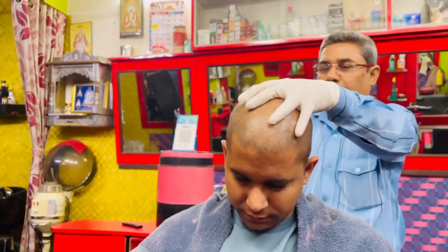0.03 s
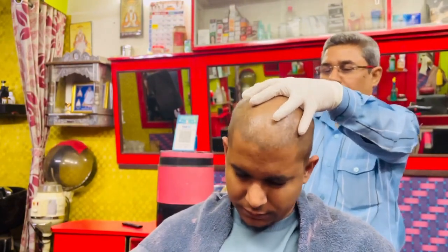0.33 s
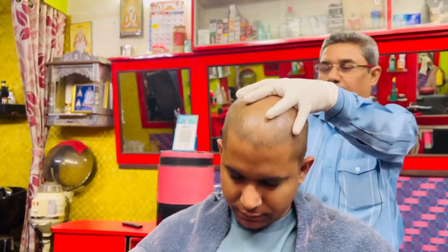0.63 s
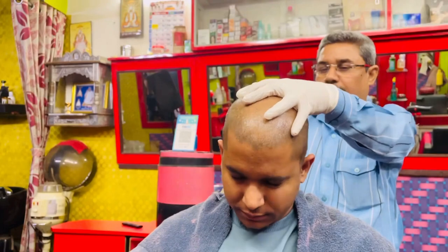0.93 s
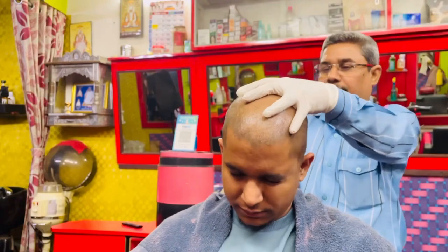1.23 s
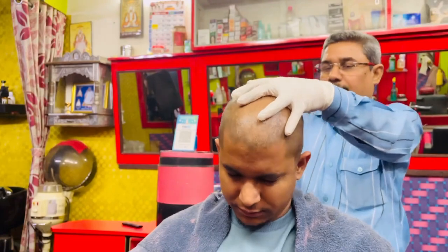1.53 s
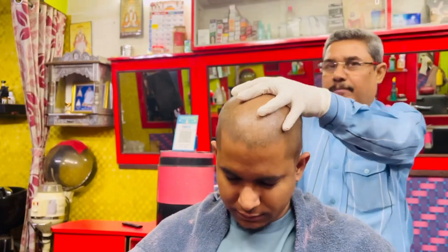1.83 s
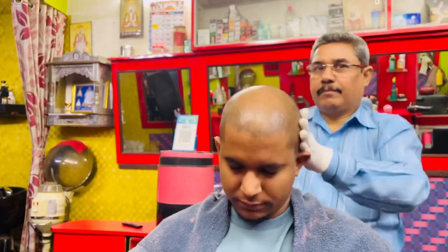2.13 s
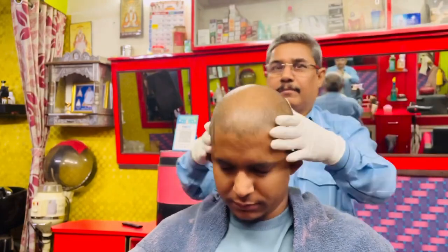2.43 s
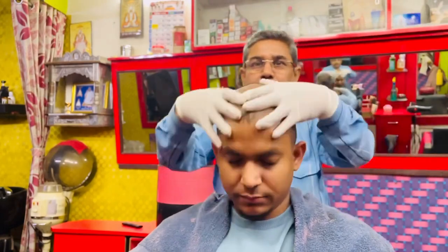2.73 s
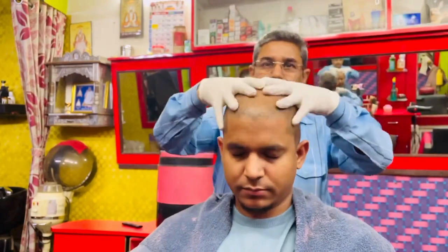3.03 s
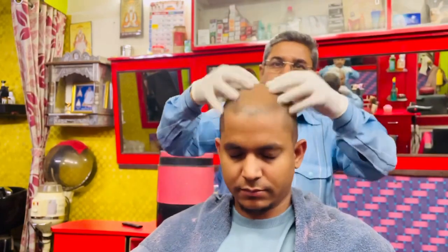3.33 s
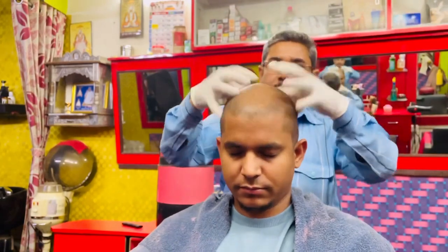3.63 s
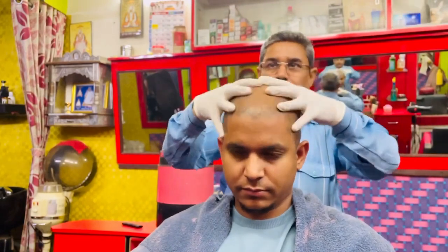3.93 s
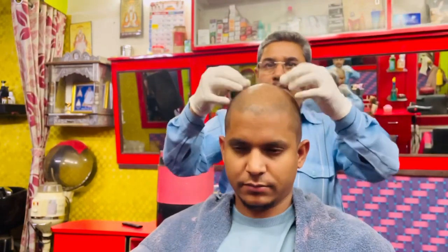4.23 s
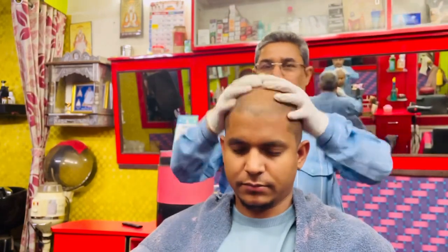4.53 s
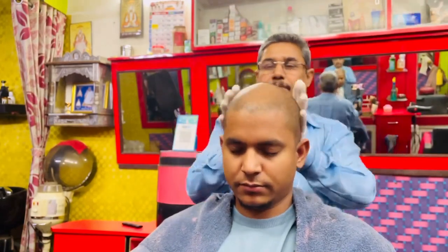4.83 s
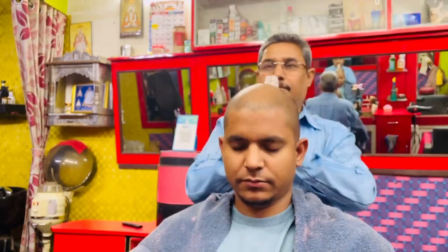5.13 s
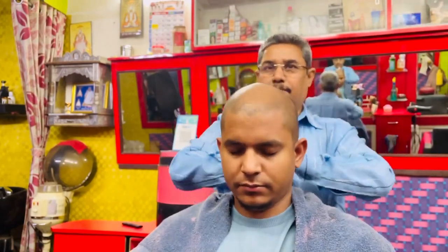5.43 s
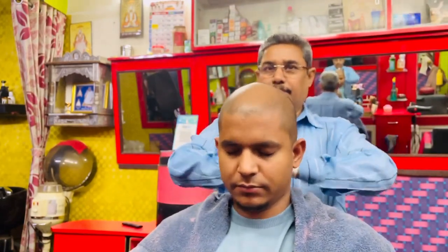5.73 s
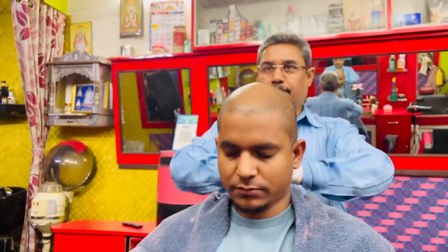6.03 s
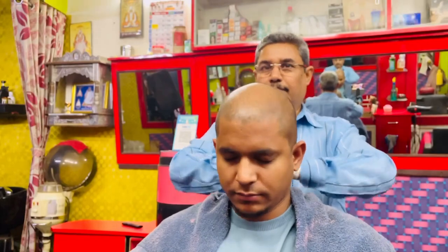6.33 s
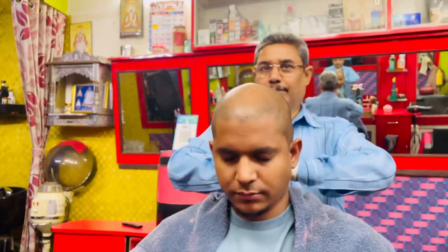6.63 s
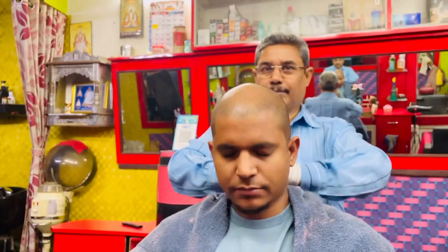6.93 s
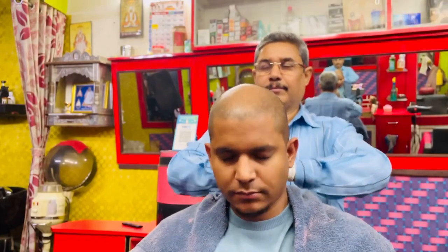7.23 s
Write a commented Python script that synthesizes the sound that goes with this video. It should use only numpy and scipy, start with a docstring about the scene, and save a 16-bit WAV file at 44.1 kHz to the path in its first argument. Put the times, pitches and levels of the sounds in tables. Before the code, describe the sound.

Ventilation and a low motor hum fill a small room, with a stereo microphone close to a head massage. Gloved fingers tick and hiss quietly over stubble, then snap off the scalp several times amid cloth rustle and soft low bumps. The hands clap once, brightly, and go on to slap the neck about four times a second, each loud, hollow smack ringing briefly off the hard walls.

```python
"""Head massage in a barber shop.

A small, hard-walled room, one stereo microphone near the chair, ventilation and a motor behind it all.
A gloved hand creeps over a shaved scalp, both hands glide round it, hissing on the stubble, and the
fingertips flick off in a quick run. The masseur shifts his stance and claps once, then cupped hands slap
the neck about four times a second. The head hides the slaps, so they arrive mostly by way of the walls."""
import sys
import numpy as np
from scipy import signal
from scipy.fft import rfft, irfft, next_fast_len
from scipy.io import wavfile

SR = 44100
rng = np.random.default_rng(int(sys.argv[2]) if len(sys.argv) > 2 else 0)


def to_wav(sig):
    """Store sig (one row per channel, or 1-D mono) as 16-bit WAV at the path in sys.argv[1].

    Samples outside -1..1 are clipped; the rate is SR.
    """
    pcm = np.clip(np.atleast_2d(sig), -1, 1) * 32767
    pcm = np.round(pcm).astype(np.int16)
    wavfile.write(sys.argv[1], SR, pcm.T)  # frames by channels


N = 325899
TIME = np.arange(N) / SR
TAIL = TIME[:SR // 2]   # time axis of one hit or echo
HZ = np.fft.rfftfreq(len(TAIL), 1 / SR)


def from_db(db):
    return 10 ** (np.asarray(db) / 20)

def rms_one(x):
    return x / np.sqrt(np.mean(x ** 2) + 1e-20)

def energy_one(x):
    return x / np.linalg.norm(x)

def pan(left_db):
    """Stereo gains: the left goes up by left_db, the right down by as much."""
    return from_db([[left_db], [-left_db]])

def add(track, s, sound):
    """Lay a sound into a track at time s."""
    start = int(s * SR)
    track[..., start:start + sound.shape[-1]] += sound[..., :N - start]

def at_hz(points, hz):
    """Read a table on a log-frequency axis."""
    known_hz, values = np.transpose(points)
    return np.interp(np.log(hz + 1e-9), np.log(known_hz), values)

def colour(x, spectrum):
    """Give white sound a spectrum, keeping its power."""
    size = next_fast_len(N, real=True)
    gain = from_db(at_hz(spectrum, np.fft.rfftfreq(size, 1 / SR)))
    return irfft(rfft(x, size) * rms_one(gain), size)[..., :N]

def cut(x, hz, kind, order=2):
    """Butterworth filter."""
    return signal.sosfilt(signal.butter(order, hz, kind, fs=SR, output="sos"), x)

def resonate(x, hz, width_hz):
    """A resonance with gain 1 at its peak."""
    return signal.lfilter(*signal.iirpeak(hz, hz / width_hz, fs=SR), x)

def ring(x, resonances):
    """Let resonances (f/Hz, width/Hz, boost/dB) ring along with a sound, side by side."""
    return x + sum((from_db(db) - 1) * resonate(x, hz, width_hz) for hz, width_hz, db in resonances)

def waver(rate_hz):
    """A slow random drift of spread about 1."""
    knots = rng.standard_normal(300)
    return np.interp(TIME * rate_hz, np.arange(len(knots)), knots)

def surge(s, rise_s, fall_s):
    """Gain of a movement that gathers speed up to 1 at time s and slows again."""
    return np.exp(-np.maximum((s - TIME) / rise_s, (TIME - s) / fall_s))

def level_curve(rows, settle_db_per_s=53):
    """Gain from rows of (t/s, level/dB), dying away before the first and after the last."""
    s, db = np.transpose(rows)
    outside_s = np.abs(TIME - np.clip(TIME, s[0], s[-1]))
    return from_db(np.interp(TIME, s, db) - settle_db_per_s * outside_s)

def contact(spectrum, length_s, tilt=0):
    """A click of unit energy, smeared over the time soft skin takes to meet; tilt in dB per octave."""
    log_gain = np.log(from_db(at_hz(spectrum, HZ) + tilt * np.log2(1 + HZ / 500)))
    cepstrum = irfft(log_gain, len(TAIL))
    cepstrum[1:len(TAIL) // 2] *= 2   # minimum phase: nothing sounds before the touch
    cepstrum[len(TAIL) // 2:] = 0
    click = np.exp(rfft(cepstrum))
    for delay_s in rng.uniform(.04, .3, 6) * length_s:
        lag = np.exp(-2j * np.pi * HZ * max(1, round(delay_s * SR)) / SR)
        click = click * (lag - .5) / (1 - .5 * lag)   # an allpass spreads it and keeps its colour
    return energy_one(irfft(click, len(TAIL)))


# Likeness of the room's sound on the two sides of the microphone: f/Hz, correlation
LIKENESS = [(30, 0.88), (130, 0.95), (260, 0.83), (500, 0.057), (1200, 0.063), (2500, 0.29), (6000, 0.014),
            (14000, 0.032)]
def diffuse(size):
    """White stereo noise as a room delivers it: alike in the bass, mostly unrelated higher up."""
    padded = next_fast_len(size, real=True)
    alike = at_hz(LIKENESS, np.fft.rfftfreq(padded, 1 / SR))
    mid, side = rfft(rng.standard_normal((2, padded)))
    left_right = np.sqrt(1 + alike) * mid + np.sqrt(1 - alike) * side * [[1], [-1]]
    return irfft(left_right, padded)[:, :size] / np.sqrt(2)


# Room tone, ventilation and distant street: f/Hz, relative level/dB
AIR_COLOUR = [(20, -24), (40, -24), (60, -1), (85, -8), (120, 0), (170, -0.5), (280, -6), (360, -8),
              (480, -5), (620, -12.5), (1300, -14.5), (2400, -23.5), (4200, -40), (7000, -50.5),
              (14000, -40.5), (16000, -55)]
# Low resonances of the shop: f/Hz, width/Hz, relative level/dB
DRONE = [(65.6, 4.3, -51), (126.4, 15, -48.5), (174.4, 12, -53.5), (287, 36, -50)]
def shop_air(rush_db=-41):
    """Ventilation rushes all round the microphone and keeps the room's low resonances droning."""
    stir = diffuse(N)
    drone = sum(from_db(db) * rms_one(resonate(stir, hz, width_hz)) for hz, width_hz, db in DRONE)
    rush = from_db(rush_db) * colour(diffuse(N), AIR_COLOUR)
    return rush + cut(drone, 500, "low")


# Tones of a motor nearby: f/Hz, relative level/dB
HUM = [(122, -52), (401, -65.5)]
# The hum swells and sinks: t/s, gain/dB
HUM_SWELL = [(0.5, 3), (1.2, 7.5), (1.9, 0), (2.7, -7), (3.5, 0.5), (4.5, -3), (7.3, -8)]
def motor_hum(waver_hz=1.69, waver_db=2.0):
    """A motor hums, each tone wavering a little in level and pitch."""
    hum = np.zeros(N)
    for hz, db in HUM:
        gain = from_db(db + waver_db * waver(rate_hz=1.6))
        pitch_hz = hz + waver_hz * waver(rate_hz=9)
        hum += gain * rms_one(np.sin(2 * np.pi * np.cumsum(pitch_hz) / SR))
    return hum * from_db(np.interp(TIME, *np.transpose(HUM_SWELL)))


def electrical_whine(band_hz=(14850, 15150), level_db=-74):
    """Something electrical in the shop whines, thin and very high."""
    return from_db(level_db) * rms_one(cut(rng.standard_normal(N), band_hz, "band", order=4))


# Reverberation of the shop: f/Hz, time to fall 60 dB/s
ROOM_T60 = [(100, 0.71), (300, 0.51), (800, 0.37), (2100, 0.39), (5500, 0.41), (14000, 0.41)]
def room_tail(build_s):
    """Dense wall echoes of unit energy build up, then die away, the bass last."""
    noise, centres_hz = rfft(diffuse(len(TAIL))), np.geomspace(200, 14000, 5)
    tail = 0
    for hz, share in zip(centres_hz, np.eye(len(centres_hz))):
        band = irfft(noise * at_hz(np.c_[centres_hz, share], HZ), len(TAIL))
        tail = tail + band * from_db(-60 * TAIL / at_hz(ROOM_T60, hz))
    build_up = 1 - np.exp(-(TAIL / build_s) ** 2)
    return rms_one(tail * build_up) / np.sqrt(len(TAIL))

def lumpy(tail, lump_s=0.0011, lump_db=2.5, merge_s=0.092):
    """Wall echoes arrive in bunches at first and merge into a smooth tail; the energy is kept."""
    knots = rng.standard_normal(1000)
    bunches = np.interp(TAIL / lump_s, np.arange(len(knots)), knots)
    bunched = tail * from_db(lump_db * np.clip(bunches, -2, 2) * np.exp(-TAIL / merge_s))
    return energy_one(bunched) * np.linalg.norm(tail)

def through(x, response):
    """Send a mono source through a stereo response."""
    return signal.fftconvolve(x[None], response, axes=1)[:, :len(x)]

def in_room(sound, room_db):
    """A sound in plain view of the microphone, a little to the right, and the room's answer."""
    echoes = from_db(room_db) * through(sound, room_tail(build_s=0.0012))
    return (sound + echoes) * pan(-1.7)


# The pressing glove lets go and creeps on until it grips: t/s, relative hiss/dB, fade/s
SLIPS = [(0.0, -65.5, 0.098), (0.629, -54.5, 0.24), (1.07, -63.5, 0.14), (1.441, -62.5, 0.12),
         (1.631, -59.5, 0.55)]
# Twang of the taut rubber: f/Hz, width/Hz, boost/dB
SLIP_RING = [(3050, 200, 5), (4330, 180, 7.5), (5180, 100, 7)]
# Snap of a gloved fingertip, slipping or flicking: f/Hz, relative level/dB
SNAP_COLOUR = [(300, -14), (800, 3), (1100, 4.5), (1600, 4), (2300, 4), (3500, 2), (5000, 0.5),
               (7000, -0.5), (10000, 1.5), (13000, -7), (16000, -10.5)]
def slips(tick_gain_db=27.5):
    """Sticking rubber lets go of the scalp with a tick."""
    track = np.zeros((2, N))
    for s, hiss_db, _ in SLIPS:
        tick = ring(contact(SNAP_COLOUR, length_s=0.006, tilt=-0.5), SLIP_RING)
        add(track, s, from_db(hiss_db + tick_gain_db) * in_room(tick, room_db=6))
    return track


# Both hands glide round the head: t/s, relative hiss/dB
GLIDE = [(1.9, -75), (1.972, -58), (2.07, -54), (2.25, -53.5), (2.352, -66.5), (2.428, -54), (2.624, -53),
         (2.696, -46.5), (3.15, -60.5)]
def glove_pace(resting_db=-96, slip_rise_s=0.0086, glide_gain_db=2.5):
    """Speed of rubber over the scalp, as gain of the hiss; even a resting glove is never quite still."""
    creeping = sum(from_db(db) * surge(s, slip_rise_s, fade_s) for s, db, fade_s in SLIPS)
    sweeping = sum(from_db(db) * surge(s, rise_s, fall_s) for s, _, db, rise_s, fall_s in SWEEPS)
    gliding = from_db(glide_gain_db) * level_curve(GLIDE)
    return np.sqrt(from_db(resting_db) ** 2 + creeping ** 2 + gliding ** 2 + sweeping ** 2)

def stubble_ticks(per_s, spread_db):
    """Stubble catches the rubber and lets go in tiny ticks of uneven size; rms 1."""
    sizes = from_db(spread_db * np.minimum(rng.exponential(1, N), 4))
    signs = rng.choice([-1, 1], N)
    return rms_one(sizes * signs * (rng.random(N) < per_s / SR))


# Slower strokes of the whole hand: middle t/s, relative level/dB, length/s, scrape f/Hz, width/share of f
STROKES = [(0.39, -50.5, 0.39, 1030, 0.3), (3.95, -38.5, 0.19, 950, 0.41), (2.74, -47, 0.24, 2530, 0.3),
           (3.2, -50.5, 0.096, 4970, 0.6), (4.29, -39.5, 0.17, 440, 0.3), (4.73, -55, 0.32, 3650, 0.97),
           (4.96, -50, 0.35, 6100, 1), (5.138, -43.5, 0.22, 3600, 0.86), (5.13, -35.5, 0.2, 1140, 0.69)]
def rubbing(gather_lead_s=0.1, gather_db=-42, gather_s=0.071, gather_hz=5440, gather_width=0.65):
    """Fingertips hiss over the stubble; each stroke swells the hiss and adds a pitched scrape."""
    grip = from_db(0.8 * waver(rate_hz=22))   # the rubber holds and gives unevenly
    hiss = stubble_hiss() * grip
    grains = stubble_ticks(per_s=1800, spread_db=1.5)
    # before every flick the fingers gather in one quick stroke, the louder the harder the flick
    gathers = [(s - gather_lead_s, gather_db + 0.9 * flick_db, gather_s, gather_hz, gather_width)
               for s, flick_db, *_ in FLICKS]
    for s, level_db, length_s, hz, width in list(STROKES) + gathers:
        start_s, size = s - length_s / 2, int(length_s * SR)
        catches = grains[int(start_s * SR):][:size]
        # slow, low strokes hardly hiss; quick ones spray treble
        spray = from_db(1) * (hz / gather_hz) ** 2 * rms_one(cut(catches, hz, "high"))
        scrape = rms_one(resonate(catches, hz, width * hz))
        add(hiss, start_s, from_db(level_db) * np.hanning(size) * (scrape + spray))
    return from_db(-3.5) * in_room(hiss, room_db=2.5)


# Rubber on stubble: f/Hz, relative level/dB
RUB_COLOUR = [(500, 12), (1500, 10), (2600, 8), (4500, 10.5), (6500, 9), (10000, 9.5), (14000, 7),
              (16000, -5)]
def stubble_hiss():
    """Dense ticks blur into a hiss that follows the pace of the gloves."""
    return colour(stubble_ticks(per_s=1200, spread_db=1.0), RUB_COLOUR) * glove_pace()


# Sweeps of an arm: peak t/s, sleeve level/dB, relative glove hiss/dB, rise/s, fall/s
SWEEPS = [(2.83, -37.5, -65, 0.027, 0.019), (3.54, -39.5, -51, 0.041, 0.083),
          (3.959, -26, -39.5, 0.045, 0.075), (4.25, -31.5, -64, 0.1, 0.031), (4.35, -32, -61, 0.035, 0.042),
          (5.14, -23.5, -45.5, 0.058, 0.11)]
# The masseur's body stirs beside the chair: t/s, relative level/dB
BUSTLE = [(3.5, -51), (3.95, -41), (4.16, -39.5), (4.78, -34), (5.17, -26.5), (5.62, -38.5), (7.09, -42),
          (7.39, -50)]
# Dull rustle of sleeves and towel: f/Hz, relative level/dB
CLOTH_COLOUR = [(25, -24), (60, -1.5), (120, -3.5), (190, -1), (280, -4.5), (450, -12.5), (900, -15),
                (1600, -24.5), (3000, -35), (8000, -42.5)]
def cloth(bustle_gain_db=-2.5):
    """Shirt and towel rustle as the body stirs; a sleeve flaps with each sweep of an arm."""
    flaps = sum(from_db(db) * surge(s, rise_s, fall_s) for s, db, _, rise_s, fall_s in SWEEPS)
    stirring = from_db(bustle_gain_db) * level_curve(BUSTLE)
    return colour(diffuse(N), CLOTH_COLOUR) * np.hypot(flaps, stirring)


# Arms and shifting weight: t/s, level/dB, f/Hz, rise/s
THUMPS = [(3.53, -31, 123, 0.011), (3.753, -34, 69.5, 0.024), (3.955, -24, 185, 0.014),
          (4.228, -23, 175, 0.017), (4.253, -34, 261.5, 0.021), (4.325, -22.5, 130, 0.014),
          (4.34, -24.5, 73, 0.012), (4.402, -28, 58.4, 0.021), (4.562, -18, 74.6, 0.0068),
          (4.698, -17.5, 80.4, 0.0059)]
def thumps():
    """Weight lands softly: a low tone swells and dies with the contact force."""
    track = np.zeros(N)
    for s, level_db, hz, rise_s in THUMPS:
        force = TAIL / rise_s * np.exp(1 - TAIL / rise_s)
        add(track, s, from_db(level_db) * force * np.sin(2 * np.pi * hz * TAIL))
    return track


def close_hit(click, resonances, room_db, ring_share, build_s):
    """A click reaches the microphone with all its ring; only a share of the ring goes to the walls."""
    direct = ring(click, resonances)
    spill = click + ring_share * (direct - click)
    echoes = through(energy_one(spill), lumpy(room_tail(build_s)))
    return energy_one(direct) + from_db(room_db) * echoes


# Flicks near the microphone: t/s, level/dB, length/s, tilt/dB per octave, room/dB, four knocks f/Hz
FLICKS = [(3.311, -6.5, 0.0066, 5, 3, 2020, 3250, 4300, 6300),
          (3.521, -6, 0.0028, 5.5, 3.5, 1240, 2180, 3400, 5100),
          (3.7463, -2.5, 0.0019, 3.5, 2.5, 2330, 3670, 5040, 6600),
          (3.958, -5.5, 0.0067, 7.5, -3, 1940, 3750, 4930, 5800),
          (4.175, -3, 0.0032, 5, 4.5, 1850, 3350, 4900, 6000),
          (4.385, -3.5, .0035, 5, 1.5, 1500, 2400, 4300, 5000),
          (4.611, -3, 0.0015, -1, 3, 800, 2000, 3500, 4460),
          (5.381, -10.5, 0.0027, -4, 6, 2250, 2470, 3000, 4300)]
def flicks(slide_db=-11, slide_s=0.0011, knock_width_hz=260, knock_db=12, trail_s=0.0025, trail_db=-7):
    """Fingertips slide and snap off the scalp, one trailing; the hollows between the fingers knock."""
    track = np.zeros((2, N))
    for s, level_db, length_s, tilt, room_db, *knocks_hz in FLICKS:
        slide = contact(SNAP_COLOUR, 2 * slide_s, tilt)
        snap = contact(SNAP_COLOUR, length_s, tilt)
        hollows = [(hz, knock_width_hz, knock_db) for hz in knocks_hz]
        knock = close_hit(snap, hollows, room_db, ring_share=0.28, build_s=0.00074)
        last_finger = contact(SNAP_COLOUR, trail_s, tilt=1.5)
        add(track, s - slide_s, from_db(level_db + slide_db) * slide)
        add(track, s, from_db(level_db) * knock)
        add(track, s + trail_s, from_db(level_db + trail_db) * last_finger)
    return track * pan(-0.5)


# One clap in view of the microphone, fingers first and then palms: t/s, level/dB, length/s
CLAP = [(4.986, -10, 0.0031), (4.992, 12, .0017)]
# Crack of flat hands: f/Hz, relative level/dB
CLAP_COLOUR = [(100, -35), (400, -2), (800, -2.5), (1400, -9.5), (2300, -5.5), (3200, -5.5), (4500, -8),
               (7000, -13.5), (13000, -12), (14500, -38), (16000, -43)]
# Air between the palms: f/Hz, width/Hz, boost/dB
CLAP_RING = [(1600, 180, 15.5), (2700, 210, 13), (3170, 450, 13.5), (6100, 910, 10)]
def clap():
    """Flat hands meet in one bright crack; the ring of the air between them is beamed mostly forwards."""
    track = np.zeros((2, N))
    for s, level_db, length_s in CLAP:
        crack = contact(CLAP_COLOUR, length_s)
        heard = close_hit(crack, CLAP_RING, room_db=4.0, ring_share=0.25, build_s=0.00067)
        add(track, s, from_db(level_db) * heard)
    return track


# Ways from the neck to the microphone: delay/ms, left/dB, right/dB, share of the lean, crack/dB
NECK_PATHS = [(0, -30, -28, 0.18, 1), (4.56, -14.5, -12, 0.02, 7.5), (9.595, -5, -6.5, 1, -6),
              (10.973, -27, -8, 1, -5), (16.67, -6.5, -20, 1, -4), (19.17, -29, -13, 1, -2),
              (23.72, -15, -13, 1, -6), (30.67, -19, -18, 1, -6), (60.9, -18.5, -20, 0.96, -6)]
def early_echoes(lean_ms, size, jitter_s=.00002):
    """The first path bends round the head; from the third on, sound flutters between two near walls."""
    smack_paths, crack_paths = np.zeros((2, size)), np.zeros((2, size))
    for delay_ms, left_db, right_db, lean_share, crack_db in NECK_PATHS:
        arrival_s = abs((delay_ms + lean_share * lean_ms) / 1000 + rng.normal(0, jitter_s))
        gains = from_db([left_db, right_db])
        smack_paths[:, int(arrival_s * SR)] += gains
        crack_paths[:, int(arrival_s * SR)] += gains * from_db(crack_db)
    return smack_paths, crack_paths

def late_echoes(walls, build_s, spot_share=0.26, level_db=1.58, start_s=0.002):
    """Each slap lands on a slightly different spot, which changes a share of the echoes' energy."""
    tail = np.sqrt(1 - spot_share) * walls + np.sqrt(spot_share) * room_tail(build_s)
    return np.pad(from_db(level_db) * lumpy(tail), [(0, 0), (int(start_s * SR), 0)])


# Cupped slaps on the side of the neck hidden from the microphone: t/s, level/dB, air pocket f/Hz,
# its boost/dB, finger gap f/Hz, its boost/dB, tilt/dB per octave, rubber crack/dB, finger touch/dB,
# shift of the echoes as the head leans/ms
SLAPS = [(5.626, 10.5, 1290, 4.5, 1650, 3, -1.5, -13, -21, 0.11),
         (5.8592, 18, 1395, 13.5, 2620, 6, 0, -10, -20, 0.1),
         (6.0914, 17.5, 1295, 10, 1550, 5, -0.65, -19, -16, 0.12),
         (6.321, 18.5, 1340, 10.5, 1570, 5.5, -0.5, -12, -19, -0.12),
         (6.5522, 17.5, 1320, 10, 2440, 3.5, 0.5, -6, -13.5, -0.38),
         (6.7857, 11, 1110, 6, 2340, -18, 0.1, -6, -17, 0.2),
         (7.0166, 13.5, 1250, 7.5, 2110, 8, -0.9, -15, -22, 0.1),
         (7.243, 16, 1550, 11, 3150, 6.5, -0.5, -20, -19, 0.1)]
# Smack of glove on skin: f/Hz, relative level/dB
SLAP_COLOUR = [(120, -15.5), (300, -3), (430, -7), (750, 0.5), (1500, 0), (2200, -1), (3100, -1),
               (4200, -6.5), (6800, -10.5), (9000, -11.5), (13500, -16.5), (16000, -44)]
# Resonances of the shop that the slaps stir up: f/Hz, width/Hz, boost/dB
ROOM_MODES = [(425, 13.5, 10.5), (470, 25, 10.5), (686, 17, 4), (970, 11, 6.5), (1115, 31, 6),
              (1274, 24, 3), (1427, 10, 3.5), (1552, 23, 5), (1586, 15, 5), (1620, 20, 3), (1718, 22, 8),
              (1820, 28, 5), (1845, 9.9, 6), (2074, 26, 3), (2296, 24, 7.5), (3094, 26, 4)]
def slaps(smack_s=.0014, pocket_width_hz=400, gap_width_hz=320, build_s=0.0047,
          touch_s=.002, brush_s=0.0042, brush_db=-28):
    """The glove brushes the neck, the fingers touch, then skin smacks and the cupped air rings."""
    track, walls = np.zeros((2, N)), room_tail(build_s)
    for s, level_db, pocket_hz, pocket_db, gap_hz, gap_db, tilt, crack_db, touch_db, lean_ms in SLAPS:
        smack = contact(SLAP_COLOUR, smack_s, tilt)
        smack = ring(smack, [(pocket_hz, pocket_width_hz, pocket_db)])
        smack = ring(smack, [(gap_hz, gap_width_hz, gap_db)])
        crack = from_db(crack_db) * cut(contact(SLAP_COLOUR, length_s=0.0015), 2800, "high")
        late = late_echoes(walls, build_s)
        early, crack_paths = early_echoes(lean_ms, late.shape[1])
        body = through(energy_one(smack), ring(early + late, ROOM_MODES))
        edge = through(crack, crack_paths)   # the rubber's crack rides on the first echoes only
        touch = contact(SLAP_COLOUR, touch_s, tilt=1.5)
        brush = contact(SLAP_COLOUR, brush_s)
        add(track, s - brush_s, from_db(level_db + brush_db) * brush)
        add(track, s - touch_s / 2, from_db(level_db + touch_db) * touch)
        add(track, s - smack_s / 2, from_db(level_db) * (body + edge))
    return track * pan(0.2)


def scene():
    """Hands and body over the steady air of the shop."""
    hands = slaps() + slips() + flicks() + clap() + rubbing()
    body = cloth() + thumps()
    room_tone = shop_air() + motor_hum() + electrical_whine()
    return hands + (body + room_tone) * pan(0.7)


def record(dry, null_hz=8800, null_width_hz=3000, opposed_db=-0.5, mono_above_hz=11800, top_hz=16000):
    """The microphone's two ports are out of phase in one treble band and merge above it."""
    mid, side = (dry[0] + dry[1]) / 2, (dry[0] - dry[1]) / 2
    opposed = resonate(mid, null_hz, null_width_hz)
    mid = mid - opposed
    side = cut(side + from_db(opposed_db) * opposed, mono_above_hz, "low", order=12)
    clipped = np.clip([mid + side, mid - side], -1, 1)   # peaks overload
    top_cut = signal.ellip(10, .1, 80, top_hz, fs=SR, output="sos")
    return signal.sosfilt(top_cut, clipped)


dry = scene()
out = record(dry)
to_wav(out)
```